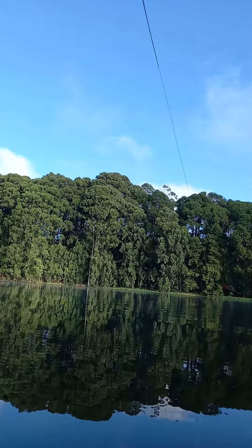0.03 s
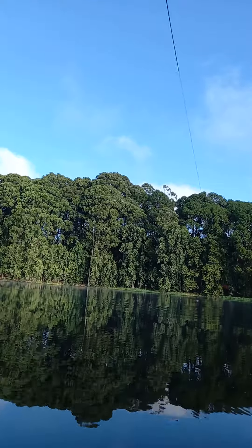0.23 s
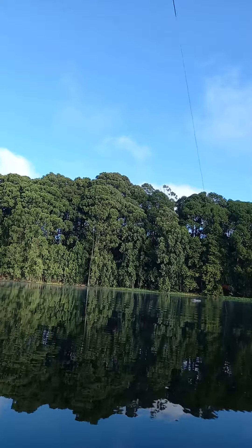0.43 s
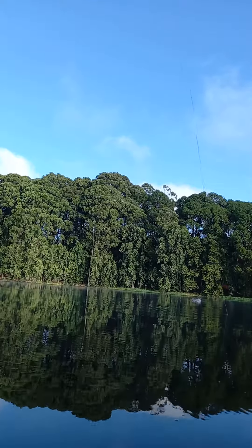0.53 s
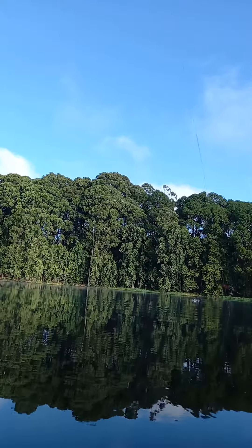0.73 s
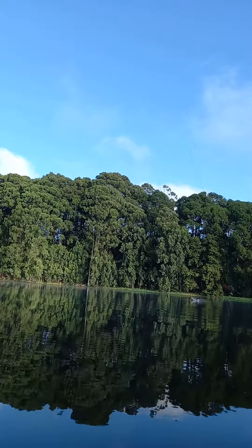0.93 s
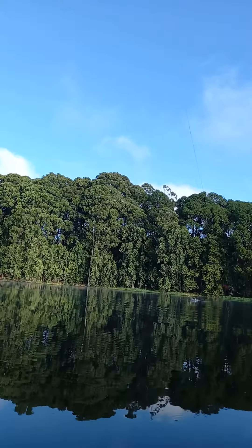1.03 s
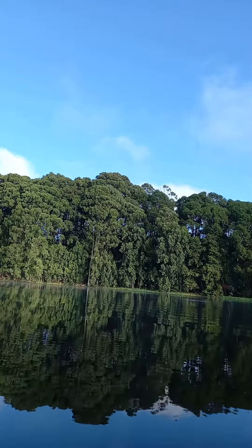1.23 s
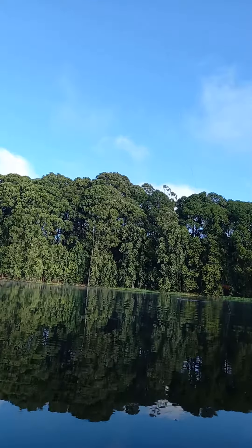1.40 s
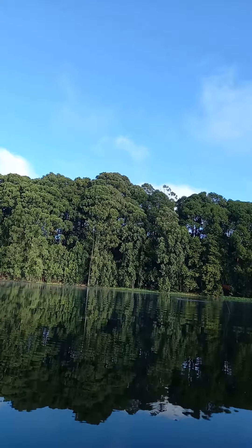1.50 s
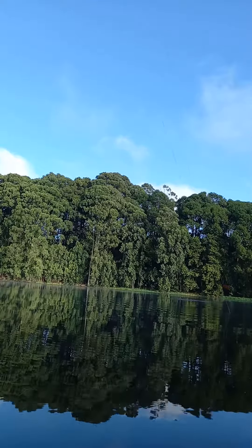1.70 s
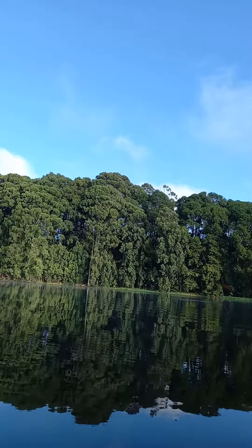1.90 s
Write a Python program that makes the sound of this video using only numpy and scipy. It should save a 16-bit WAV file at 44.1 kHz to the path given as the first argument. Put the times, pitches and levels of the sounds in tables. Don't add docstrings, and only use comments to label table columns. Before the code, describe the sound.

A close, bright ratchet whir from a fishing reel, winding down to separate clicks over still water

```python
import sys
import numpy as np
from scipy import signal
from scipy.io import wavfile
from scipy.ndimage import uniform_filter1d, minimum_filter1d

SR = 44100
rng = np.random.default_rng(int(sys.argv[2]) if len(sys.argv) > 2 else 0)


def boost(x):
    u = np.asarray(x, float) / 20
    return 10 ** u


def log_audio(samples):
    frames = np.atleast_2d(samples).T
    limited = np.clip(frames, -1, 1)
    pcm = np.round(limited * 32767).astype(np.int16)
    wavfile.write(sys.argv[1], SR, pcm)


N = 85995


def rms_one(x):
    return x / np.sqrt(np.mean(x ** 2) + 1e-20)


def at_hz(points, hz):
    table = np.array(points)
    return np.interp(np.log(hz), np.log(table[:, 0]), table[:, 1])


def band(x, low_hz, high_hz):
    edges = [low_hz, min(high_hz, .45 * SR)]
    return signal.sosfilt(signal.butter(2, edges, "band", fs=SR, output="sos"), x)


def ring(clicks, hz, t60):
    decay, turn = boost(-60 / (t60 * SR)), 2 * np.pi * hz / SR
    return signal.lfilter([0, np.sin(turn)], [1, -2 * decay * np.cos(turn), decay * decay], clicks + 1e-18)


def pair(alike):
    mid, side = rng.standard_normal((2, N))
    alike = np.clip(alike, 0, 1)
    return np.sqrt(1 + alike) * mid + np.sqrt(1 - alike) * side * np.array([[1], [-1]])


# f/Hz, likeness/0-1
PORT_LIKENESS = [(30, 0.2), (130, 1), (300, 0.9), (600, 1), (1400, 0.1), (3100, 0.2), (15000, .05)]


def coloured(spectrum, alike=1):
    edges = np.geomspace(spectrum[0][0], spectrum[-1][0], num=20)
    total = 0
    for low, high in zip(edges, edges[1:]):
        centre = np.sqrt(low * high)
        noise = pair(alike * at_hz(PORT_LIKENESS, centre))
        total = total + boost(at_hz(spectrum, centre)) * band(noise, low, high)
    return rms_one(total)


# t/s, tooth rate f/Hz, strike level/dB, extra level/dB under 7 kHz, more level/dB under 4 kHz
SPOOL_RUN = [
    (0.2508, 288.3, -30, 5.3, -6),
    (.28, 441.8, -24, -0.5, 7),
    (.39, 637.9, -26, 0.5, -1),
    (0.441, 480.9, -25.5, 1.5, 2.5),
    (.49, 359.6, -25.5, 0, 3.5),
    (.54, 302.9, -22.5, 0, -0.2),
    (0.641, 353.6, -21, -2.5, -4.6),
    (0.802, 315.6, -23, -0.5, -2),
    (0.826, 225.2, -23, -0.2, -3),
]
# t/s, peak level/dB, extra level/dB under 7 kHz, more level/dB under 4 kHz
SINGLE_TEETH = [(0.2294, -31.5, 0.1, -9), (0.2354, -33.5, -2, -12), (0.2414, -30, 4, -21),
                (0.2454, -27, 2.5, -2), (0.8284, -24, 2, -3), (0.8334, -19, -2, -16),
                (0.8384, -28.5, 6, -7), (0.8444, -24.5, -4, -3), (0.8494, -23, -4.5, 5),
                (0.8554, -27.5, 2.5, 0), (0.8614, -23, -1.8, 3), (0.8689, -22, -1.5, 1),
                (0.8764, -25, 2, -1), (0.8854, -26.5, 0.5, 8.5), (0.8944, -26, 2, 7.5),
                (0.9048, -23.5, -3.1, 1.5), (0.9154, -25.5, 1.5, -14), (0.9298, -30.5, 1.8, 1),
                (0.9467, -24.5, -0.8, -6.5), (0.9692, -30, 1.9, -6), (0.9991, -27, -2.7, -3),
                (1.4596, -37.5, 4, -13.5), (1.8886, -36.5, 6.9, -9.5)]


def strikes():
    run_s, run_hz, run_db, run_low_db, run_deep_db = np.transpose(SPOOL_RUN)
    t = np.arange(run_s[0], run_s[-1], 1 / SR)
    teeth_passed = np.cumsum(np.interp(t, run_s, run_hz)) / SR
    when = np.interp(np.arange(int(teeth_passed[-1])), teeth_passed, t)
    chance = rng.standard_normal((400, 2))[:len(when)]
    single_s, single_db, single_low_db, single_deep_db = np.transpose(SINGLE_TEETH)
    level = np.append(single_db + 0.5, np.interp(when, run_s, run_db) - 0.26 * chance[:, 0])
    low_db = np.append(single_low_db, np.interp(when, run_s, run_low_db))
    deep_db = np.append(single_deep_db, np.interp(when, run_s, run_deep_db))
    jitter = .06 * chance[:, 1] / np.interp(when, run_s, run_hz)
    return np.append(single_s, when + jitter), level, low_db, deep_db


def near_echo(out):
    t = np.arange(int(.15 * SR)) / SR
    decay = boost(-42 - 60 * t / .25) + boost(-2 - 60 * t / .03)
    for port in range(2):
        tail = rng.standard_normal(len(t)) * decay * (t > .002) / 20
        out[port] += signal.fftconvolve(out[port], tail)[:N]
    return out


# f/Hz, level/dB, t60/s, left-right level/dB
BODY_MODES = [(3191, -16.5, .007, 0), (3653, -12, 0.021, 4), (4351, -8.5, 0.017, 2), (5027, -9, 0.01, -13),
              (5732, -9.5, 0.0086, -5), (6846, -10, 0.0088, 0), (8150, -23, 0.0078, -12.5),
              (9282, -11.5, .006, 1.5), (11020, -9, 0.0018, 10.5), (11710, -5, 0.01, 0.5),
              (12470, -1.5, 0.0054, 11.5), (13590, -2.5, .006, -1.5), (14700, -4.5, 0.0034, 14),
              (16560, 2.5, 0.0027, -6.5)]
# f/Hz, level/dB, t60/s
MORE_BODY_MODES = [(2270, -24, .012), (9830, -29, 0.018), (5060, -29, 0.0202), (5953, -18.5, .022),
                   (13700, -28.5, .022), (15180, -23.5, .022)]
# f/Hz, level/dB, t60/s
SPRING_MODES = [(11870, -27, .11), (8380, -35, .13), (4200, -31, .025)]
# f/Hz, width/Hz, depth/0-1
DEAD_SPOT = [(7550, 320, 0.75)]


def clicker():
    s, db, low_db, deep_db = strikes()
    chatter_s, peak = .0022, .2
    late = ((np.arange(8) + rng.random((450, 8))) / 8)[:len(s)]
    at = ((s[:, None] + chatter_s * late) * SR).astype(int)
    swell = boost(np.minimum(59 * (late - peak), 14.5 * (peak - late)))
    mode_spread_db, port_spread_db, tilt_db = 2.5, 1.5, 2.0
    out = np.zeros((2, N))
    for hz, mode_db, t60, *left_db in BODY_MODES + MORE_BODY_MODES + SPRING_MODES:
        tooth = rng.standard_normal((450, 3))[:len(s)]
        touch = rng.choice([-1, 1], (450, 8))[:len(s)]
        summed = np.abs(np.sum(swell * touch * np.exp(2j * np.pi * hz * at / SR), axis=1))
        touch = touch * np.minimum(np.linalg.norm(swell, axis=1) / summed, 2)[:, None]
        tilt = np.interp(s, np.linspace(.2, 1, num=10), rng.standard_normal(10))
        shared_db = db + mode_db + tilt_db * tilt + mode_spread_db * tooth[:, 2]
        shared_db = shared_db + low_db * (hz < 7000) + deep_db * (hz < 4000)
        clicks = np.zeros((2, N))
        for port, half in enumerate([.5, -.5]):
            port_db = shared_db + port_spread_db * tooth[:, port] + half * sum(left_db)
            np.add.at(clicks[port], at, boost(port_db)[:, None] * swell * touch)
        out += ring(clicks, hz, t60)
    for hz, width_hz, depth in DEAD_SPOT:
        out = out - min(depth, 1) * signal.lfilter(*signal.iirpeak(hz, hz / width_hz, fs=SR), out)
    out = signal.sosfilt(signal.butter(4, 2436, "high", fs=SR, output="sos"), out)
    out = signal.sosfilt(signal.cheby1(6, 1, 15950, fs=SR, output="sos"), out)
    out = near_echo(out)
    out[1] = np.roll(out[1], round(.0005 * SR))
    return out


# f/Hz, level/dB per Hz
ROD_SHAKE = [(150, -40.5), (260, -9), (565, -6), (1290, -9), (1400, -3.5), (2000, -5.5), (2600, -23.5),
             (4400, -120)]
# t/s, level/dB, f/Hz, t60/s
ROD_KNOCKS = [
    (.300, -31, 1500, .006),
    (1.015, -53, 1650, .018),
    (.855, -56, 550, .025),
]


def rod():
    s, hz, *_ = np.transpose(SPOOL_RUN)
    t = np.arange(N) / SR
    speed = np.interp(t, np.r_[.23, s, .95], np.r_[0, hz, 0]) / 350
    out = boost(-55.5) * speed ** (10 / 6) * coloured(ROD_SHAKE, .2)
    out += boost(-65) * np.minimum(3.0 * speed, 1) * rms_one(band(pair(.5), 52, 217.5))
    for when, db, knock_hz, t60 in ROD_KNOCKS:
        knock = boost(db) * (np.arange(N) == int(when * SR))
        out += ring(knock, knock_hz, t60)
    return out


# t/s, peak level/dB
LINE_CREEP = [
    (0.1084, -66),
    (0.136, -55),
    (0.1501, -53.5),
    (0.1614, -62.5),
    (0.1715, -53.5),
    (0.1775, -63),
]


def creep():
    s, db = np.transpose(LINE_CREEP)
    clicks, t = np.zeros(N), np.arange(N) / SR
    clicks[((s + .0008) * SR).astype(int)] = boost(db + 4.1)
    ticks = ring(clicks, 11800, .004) - ring(clicks, 13300, .003)
    ticks += ring(clicks, 14800, .003) - .4 * ring(clicks, 10000, .003)
    rise = np.interp(t, [.12, .22, .24], [0, 1, 0])
    hiss = boost(-67) * rise * rms_one(band(rng.standard_normal(N), 9800, 15500))
    left_db = -19
    return band(ticks + hiss, 12000, 15000) * boost(np.array([[left_db], [0]]))


def splash():
    since = np.maximum(np.arange(N) / SR - 0.68, 0)
    rise_s, t60, left_db = 0.13, 2.25, -14
    wash = rms_one(band(pair(0.9), 394, 2130)) * boost(np.array([[left_db], [0]]))
    return wash * np.minimum(since / rise_s, 1) * boost(-52 - 60 * since / t60)


# f/Hz, level/dB per Hz
LAKE_AIR = [(24, -40), (40, -17.5), (107, -2.5), (223, -15), (728, -13.5), (2370, -20.5), (3570, -30),
            (4930, -23.5), (6800, -12.5), (8840, -55.5), (15000, -120)]
# f/Hz, width/Hz, level/dB, likeness/0-1
INSECTS_AND_HUM = [
    (4802, 38, -70.5, 0),
    (5010, 40, -81.5, .2),
    (5950, 80, -87.5, 0),
    (119.4, 2.7, -76.5, .9),
    (85, 8.3, -74.5, .7),
]


def lakeside():
    out = boost(-62.5) * coloured(LAKE_AIR)
    for hz, width_hz, db, alike in INSECTS_AND_HUM:
        t60 = np.log(1000) / np.pi / width_hz
        out += boost(db) * rms_one(ring(pair(alike), hz, t60))
    out += splash()
    return signal.sosfilt(signal.cheby2(8, 40, 7200, fs=SR, output="sos"), out)


def port_hiss():
    return boost(-84) * band(pair(0), 8500, 15800)


def scene():
    return clicker() + creep() + rod() + lakeside() + port_hiss()


def thin_middle(x):
    mid_side = np.array([x[0] + x[1], x[0] - x[1]]) / 2
    hz, s, both = signal.stft(mid_side, SR, nperseg=2048, noverlap=1024)
    power = uniform_filter1d(np.mean(x ** 2, axis=0), size=300)
    quietest = minimum_filter1d(power, size=1500)
    dense = quietest[np.minimum((s * SR).astype(int), N - 1)] > boost(2 * -41)
    bands = np.add.reduceat(np.abs(both) ** 2, np.arange(0, 1025, 8), axis=1)
    bands = uniform_filter1d(bands, size=2, axis=2)
    wander_db = 2.2 * np.repeat(rng.standard_normal((129, 50)), 2, axis=1)[:, :len(s)]
    weak_db = np.array([-4.5, -8.5])[:, None, None]
    weak = bands < bands[::-1] * boost(2 * (weak_db + wander_db))
    weak = np.repeat(weak, 8, axis=1)[:, :1025] & (hz < 10000)[:, None]
    lost = (weak | (hz > 15760)[:, None]) & dense
    mid, side = both * ~lost
    left_right = np.array([mid + side, mid - side])
    return signal.istft(left_right, SR, nperseg=2048, noverlap=1024)[1][:, :N]


def roll_off(x):
    return signal.sosfilt(signal.butter(12, 17150, fs=SR, output="sos"), x)


def record(dry):
    loud = uniform_filter1d(np.mean(dry ** 2, axis=0), size=2000) > boost(2 * -49.5)
    gain = boost(-7.0 * np.cumsum(loud) / SR)
    mix = thin_middle(dry * gain)
    return roll_off(mix)


dry = scene()
out = record(dry)
log_audio(out)
```